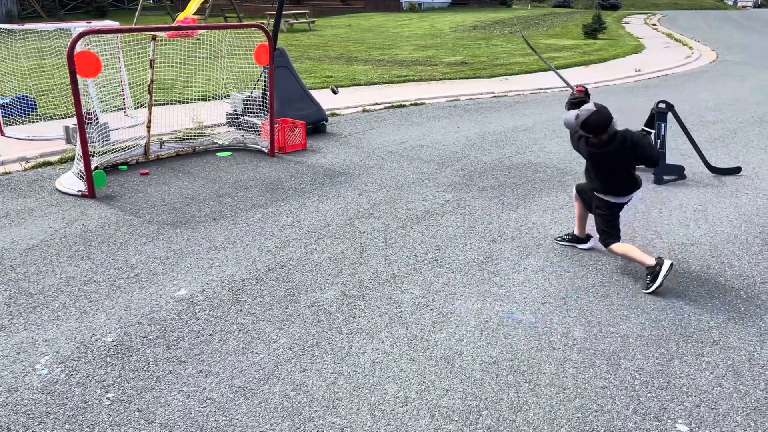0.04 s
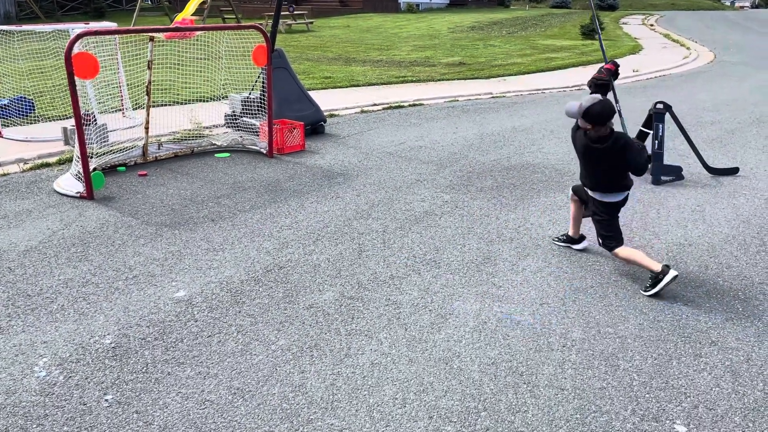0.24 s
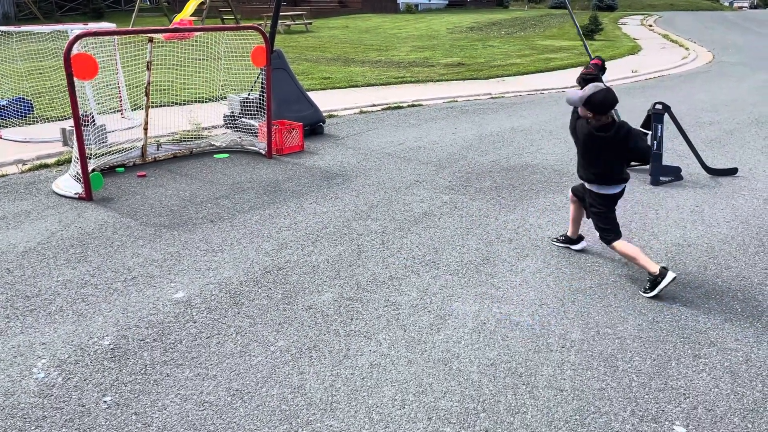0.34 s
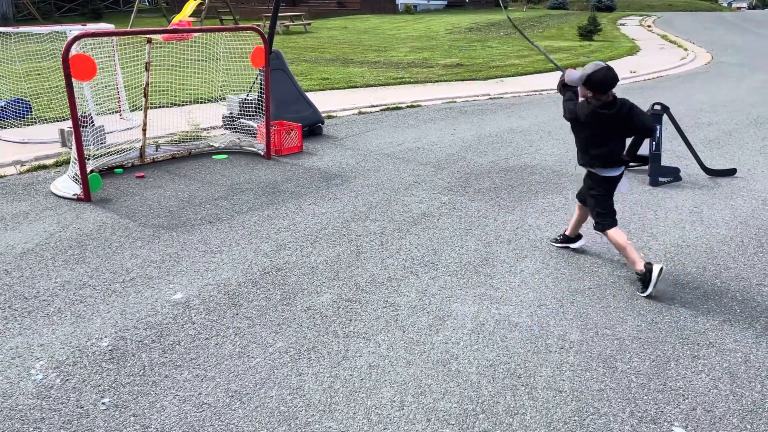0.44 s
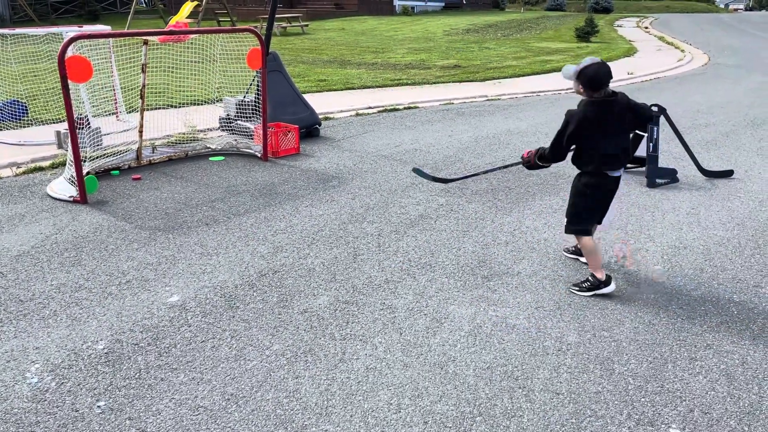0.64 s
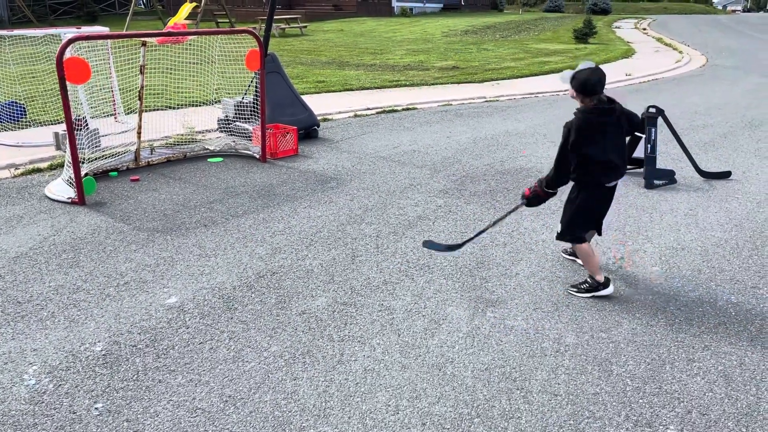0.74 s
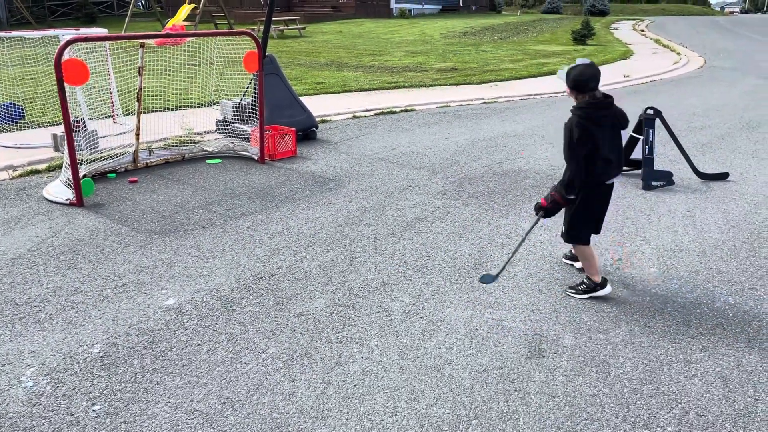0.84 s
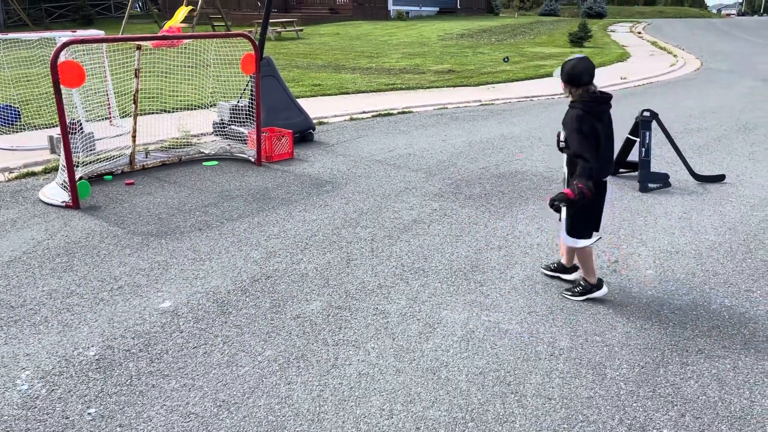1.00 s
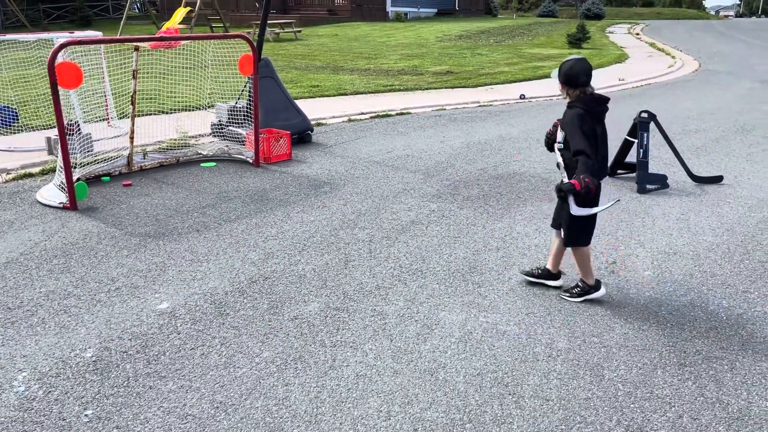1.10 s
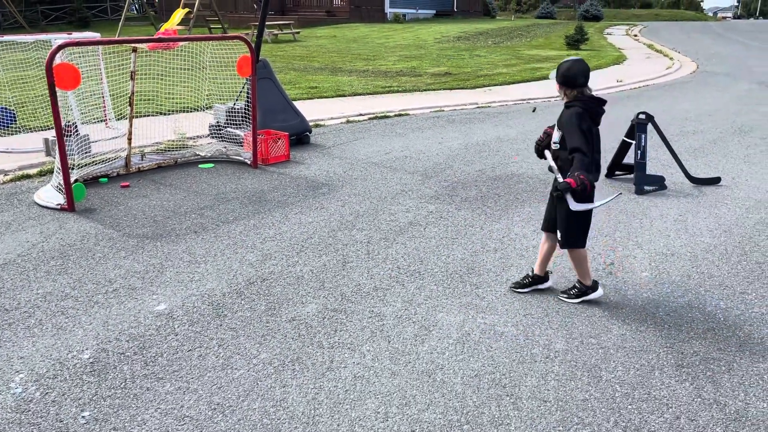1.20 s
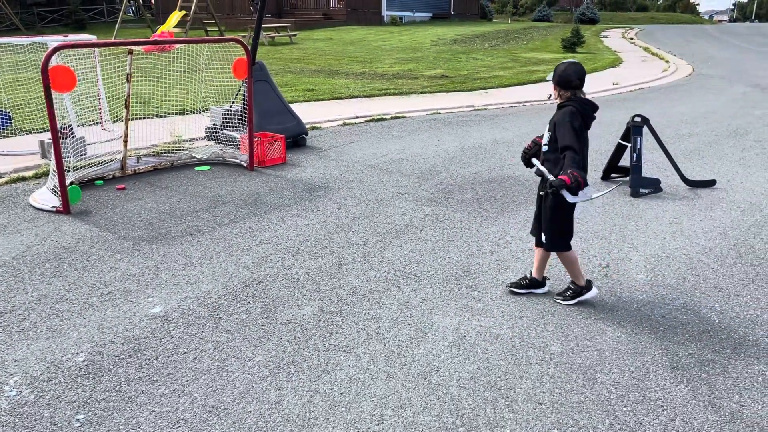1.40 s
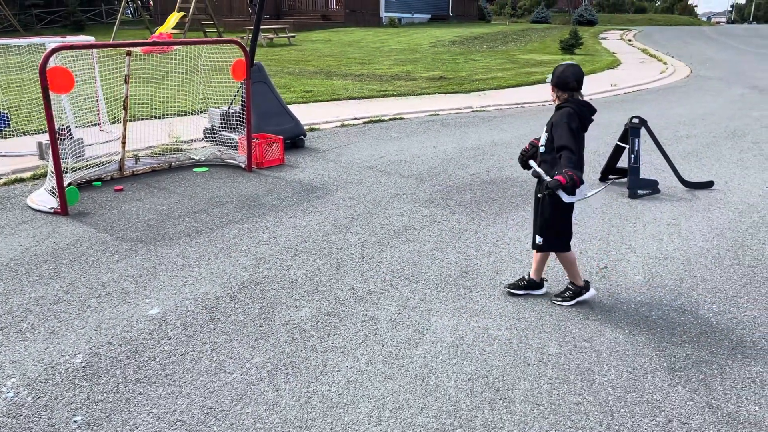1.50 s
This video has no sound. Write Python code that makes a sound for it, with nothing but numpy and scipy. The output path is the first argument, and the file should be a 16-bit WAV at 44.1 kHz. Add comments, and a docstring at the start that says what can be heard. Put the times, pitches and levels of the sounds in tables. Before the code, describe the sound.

Outdoors on pavement, a puck hits a hockey goal with a loud crack, then comes down with a quieter, crisp clack. Both impacts echo off the surroundings, with faint shoe scuffs between them and a soft rumble behind.

```python
"""Over a low outdoor rumble, the echo of a hockey shot is fading. At 0.22 s the puck grazes and strikes
a goal on a paved driveway; the impact excites the frame's modes, and houses and trees reflect the sound.
While the puck is in the air, the player's shoes scuff the asphalt. At 1.21 s the puck lands with a
short, heavily damped clack, which echoes in turn, with two short narrow-band swells."""
import sys
import numpy as np
from scipy import signal
from scipy.fft import rfft, irfft
from scipy.io import wavfile
from scipy.ndimage import uniform_filter1d

SR = 44100
rng = np.random.default_rng(int(sys.argv[2]) if len(sys.argv) > 2 else 0)


def persist_wave(psi):
    """Save psi, clipped to +-1, as 16-bit WAV."""
    counts = np.round(np.clip(psi, -1, 1) * 32767).astype(np.int16)
    wavfile.write(sys.argv[1], SR, np.atleast_2d(counts).T)


N = 68355

# Left-right coherence of near sounds and of the surroundings: f/Hz, coherence
NEAR_COHERENCE = [(200, 0.97), (1500, 0.78), (12000, 1)]
FAR_COHERENCE = [(60, 0.96), (150, 1), (300, 0.88), (640, 0.37), (1400, 0), (3000, 0.13), (7000, 0)]
# Noise spectra of the background, scuffs and grit: f/Hz, relative level/dB
RUMBLE_SPECTRUM = [(20, -28), (40, -12), (60, 0), (85, 1), (120, -6.5), (180, -6.5), (280, -16),
                   (450, -28.5), (1000, -34), (3000, -37), (5000, -43.5), (8000, -54.5), (11500, -46),
                   (16000, -62)]
SCUFF_SPECTRUM = [(100, -2), (500, -3), (1650, 5), (2700, -6), (4400, 0), (6500, -11.5), (8500, -31),
                  (11000, -12), (16000, -50)]
TICK_SPECTRUM = [(500, -18), (3000, -27), (11000, 25), (16000, -12)]
# Shoe scuffs: t/s, duration/s, level/dB
SCUFFS = [(.609, 0.015, -41.5), (0.797, 0.012, -64), (1.085, 0.0094, -61.5), (1.111, 0.01, -58),
          (1.136, 0.011, -62), (1.156, 0.02, -61), (1.192, 0.03, -53)]
# Grit ticking underfoot: t/s, level/dB
TICKS = [(0.075, -57), (.632, -50), (.72, -61.5), (0.806, -61.5)]
# Narrow-band swells in the echoes of both hits: t/s, duration/s, level/dB, f/Hz, filter bandwidth/Hz
ECHO_BLOOMS = [(0.304, 0.018, -47, 2760, 800), (.466, 0.017, -46, 2530, 600),
               (0.501, 0.032, -45.5, 2810, 537), (0.533, 0.054, -44.5, 1175, 330),
               (1.328, 0.019, -53.5, 2100, 800), (1.475, 0.04, -50.5, 2480, 503)]
# Decaying noise bands of the shot's echo, landing and goal: f/Hz, relative level/dB, T60/s
SHOT_BANDS = [(150, -6, 1), (500, -2.5, .9), (1297, 2, 0.93), (2800, -2, 1), (6700, -11, 1),
              (8300, -33, 0.78), (11000, -28.5, .7), (16000, -47, .6)]
CLACK_BANDS = [(80, -27, .09), (180, -13.5, 0.13), (400, -14.5, 0.039), (1150, -10, 0.012),
               (1620, -3.5, .015), (2500, 0.5, 0.036), (4000, -19, 0.031), (5800, -12, 0.028),
               (7800, 0.5, 0.018), (9200, -7.5, 0.013), (11600, -10.5, 0.043), (16000, -29, .022)]
CRACK_BANDS = [(60, -25.5, .1), (148, -3, 0.16), (450, -7.5, 0.13), (1250, -6, 0.087), (2700, -3, .09),
               (4080, -5.5, 0.07), (9100, -7, 0.052), (16000, -23.5, 0.043)]
# Distinct modes of the landing and of the goal: f/Hz, relative level/dB, T60/s
CLACK_MODES = [(170.5, -32, 0.11), (1631, -14.5, .015), (2190, -7.5, .016), (2385, -20, 0.015),
               (2820, -12.5, 0.012), (3418, -15, 0.027), (4700, -24, 0.021), (6834, -5, 0.012),
               (6943, -17, 0.031), (7390, -9, 0.011)]
CRACK_MODES = [(195.5, -28.5, .15), (314, -21.5, 0.082), (560, -17, .045), (710, -12.5, .05),
               (781.5, -16, 0.095), (881, -17, 0.1), (965, -14.5, .068), (1134, -21, .116),
               (1395, -18.5, 0.12), (1970, -18.5, 0.083), (2316, -14.5, .08), (2385, -18.5, 0.14),
               (2535, -15.5, .075), (2793, -16, 0.06), (2987, -14, 0.075), (3080, -15, 0.047),
               (3210, -12, .04), (3516, -11, 0.055), (5225, -16, 0.062), (6310, -17, 0.034),
               (6945, -15, 0.049)]
# Left minus right at the microphone ports: f/Hz, level/dB, phase/rad
CLACK_PORTS = [(200, 0.5, -1), (2200, -1, 0.9), (3300, 3, 0.5), (4680, 4.5, 0.6), (6940, 1.5, -1.66),
               (11040, 0, -6)]
CRACK_PORTS = [(152, 0.5, -1.44), (750, 3.5, 0.99), (1080, 9, 2.17), (2000, 5, -1.36), (2370, -1.5, 1.1),
               (2600, 7.5, 0.37), (3080, 6.5, 1.18), (3470, 1, 0.46), (6400, 1.5, -0.53),
               (10900, -0.5, -6.2)]
# Swells in the scatter, from single houses and trees: delay/s, level/dB, T60/s
CLACK_SWELLS = [(0.042, -42.5, 0.057), (.125, -52, 0.15), (.163, -50, 0.29), (.191, -43, .15),
                (0.275, -60, 0.075)]
CRACK_SWELLS = [(0.169, -43, 0.16), (0.202, -40.5, 0.19), (.288, -58, 0.35), (0.317, -47, 0.49)]
# Spectra of the scatter (the crack's also colours the graze): f/Hz, relative level/dB
CLACK_SPECTRUM = [(150, -2), (500, -8.5), (1100, -25.5), (2480, 4.5), (3000, -9), (3480, -4), (3800, -18),
                  (6100, -19), (6950, -1.5), (7400, -15.5), (8600, -38), (11400, -16.5), (15000, -39)]
CRACK_SPECTRUM = [(100, -3.5), (400, -2.5), (800, 0), (1400, 0), (2900, 2), (4000, -4), (5300, -8.5),
                  (7000, -11.5), (8500, -35), (10500, -18.5), (12500, -26), (16000, -45.5)]
# Echo from a flat wall: delay/s, gain/dB, response as rows of (f/Hz, gain/dB)
CLACK_WALL = (.2268, -23, [(2150, -11), (2600, 4), (3400, -3), (4500, -15)])
CRACK_WALL = (.2025, -28, [(300, -10), (2900, 0), (3500, -5), (5200, 7), (7000, 2), (9000, -16)])
# Microphone response: f/Hz, gain/dB
MICROPHONE = [(12500, 0), (14000, -2.5), (15000, -10), (16500, -10.5)]
# Scatter from trees and houses: level/dB, hold/s, T60/s
CLACK_SCATTER, CRACK_SCATTER = (-55.5, .26, .49), (-48, .31, .81)
# Early reflections from the driveway and nearest walls: gain/dB, T60/s
CLACK_YARD, CRACK_YARD = (-22, .11), (-18.5, .043)

CRACK_S, CLACK_S, GRAZE_S = .2199, 1.2071, .0035


def amp(db):
    """Amplitude grows tenfold for every 20 dB."""
    return 10 ** (np.asarray(db) / 20)


def unit(x):
    """Normalisation to an rms of one."""
    return x / np.sqrt(np.mean(x ** 2) + 1e-20)


def decay(t, t60):
    """Exponential damping: 60 dB in t60 seconds."""
    return np.exp(-np.log(1000) * t / t60)


def read(table, hz, column=1):
    """Interpolation of a table column on a log-frequency axis."""
    rows = np.array(table)
    return np.interp(np.log(hz + 1), np.log(rows[:, 0] + 1), rows[:, column])


def pan(db):
    """A level difference, shared equally between left and right."""
    return amp(np.array([[.5], [-.5]]) * db)


def add(mix, start_s, sound):
    """Superposition: a sound adds to the mix from start_s on."""
    part = mix[:, max(round(start_s * SR), 0):][:, :sound.shape[1]]
    part += sound[:, :part.shape[1]]


def tint(x, response):
    """Linear filtering: the spectrum is multiplied by a response."""
    hz = np.fft.rfftfreq(x.shape[1], 1 / SR)
    return irfft(rfft(x) * amp(read(response, hz)), x.shape[1])


def noise(spectrum, coherence, size):
    """Partially coherent noise: left and right share a random-phase component."""
    hz = np.fft.rfftfreq(size, 1 / SR)
    left, independent = np.exp(2j * np.pi * rng.random((2, len(hz))))
    shared = np.clip(read(coherence, hz), -1, 1)
    right = shared * left + np.sqrt(1 - shared ** 2) * independent
    return unit(irfft(np.array([left, right]) * amp(read(spectrum, hz)), size))


def flicker(size, depth_db, span):
    """Random amplitude modulation: a gain smoothed over span samples."""
    return amp(depth_db * unit(uniform_filter1d(rng.standard_normal(size), span)))


def patchy(x, depth_db=3.0):
    """Modulation in time and frequency breaks smooth noise into short patches."""
    spectra = signal.stft(x)[2]
    field = uniform_filter1d(rng.standard_normal(spectra.shape[1:]), size=4, axis=1)
    field = uniform_filter1d(field, size=5, axis=0)
    return unit(signal.istft(spectra * amp(depth_db * unit(field)))[1][:, :x.shape[1]])


def clatter(bands, coherence, rise_s, size):
    """Modal overlap: countless close modes act as noise, each band with its own rise and decay."""
    t, hz = np.arange(size) / SR, np.fft.rfftfreq(size, 1 / SR)
    centres = np.geomspace(60, 16000, 20)
    spectrum, out = rfft(noise(bands, coherence, size)), 0
    for centre, pick in zip(centres, np.eye(len(centres))):
        band = irfft(spectrum * np.interp(hz, centres, pick), size)
        rise = np.minimum(t / (rise_s + 1.3 / centre), 1)  # 1.3 cycles: low bands swell more slowly
        out = out + band * rise * decay(t, read(bands, centre, column=2))
    return out


def ring(modes, rise_s, size):
    """Free vibration: a sum of damped sinusoids of alternating sign."""
    t, out = np.arange(size) / SR, 0
    for k, (hz, db, t60) in enumerate(modes):
        envelope = amp(db) * np.minimum(t / (rise_s + 1 / hz), 1) * decay(t, t60)
        out = out + (-1) ** k * envelope * np.sin(2 * np.pi * hz * t)
    return out


def ports(x, differences):
    """A wave reaches the two microphone ports with different level and phase."""
    size = x.shape[1]
    hz = np.fft.rfftfreq(2 * size, 1 / SR)
    phase = np.array([[.5], [-.5]]) * read(differences, hz, column=2)
    return irfft(rfft(x, 2 * size) * pan(read(differences, hz)) * np.exp(1j * phase))[:, :size]


def rumble():
    """Ambient noise: low rumble and faint hiss under a slight, slow modulation."""
    swell_db = .92 * np.interp(np.arange(N), np.linspace(0, N, 16), rng.standard_normal(16))
    return amp(-52 + swell_db) * noise(RUMBLE_SPECTRUM, FAR_COHERENCE, N)


def shot_echo():
    """Reverberant decay: the last of the shot returns from far away."""
    return amp(-50.5) * clatter(SHOT_BANDS, FAR_COHERENCE, rise_s=.00052, size=32768)


def echo_blooms():
    """Band-limited noise: short narrow-band swells in the echoes of the crack and the clack."""
    out, t = np.zeros((2, N)), np.arange(SR // 10) / SR
    for start, length, db, hz, width in ECHO_BLOOMS:
        peak = signal.iirpeak(hz, hz / width, SR)
        white = rng.standard_normal((2, len(t)))
        band = unit(signal.lfilter(*peak, signal.lfilter(*peak, white)))
        add(out, start, amp(db) * np.sin(np.pi * np.minimum(t / length, 1)) * band)
    return out


def scatter(tail, swells, spectrum):
    """Diffuse scattering: returns from houses and trees are incoherent, so their powers add."""
    t = np.arange(SR) / SR
    tail_db, hold_s, tail_t60 = tail
    power = (amp(tail_db) * np.minimum(t / .015, 1) * decay(np.maximum(t - hold_s, 0), tail_t60)) ** 2
    for delay, db, t60 in swells:
        age = np.maximum(t - delay, 0)
        power += (amp(db) * np.minimum(age / .004, 1) * decay(age, t60)) ** 2
    grain = flicker(SR, depth_db=.5, span=150)
    return np.sqrt(power) * grain * patchy(noise(spectrum, FAR_COHERENCE, SR))


def add_paths(out, hit, yard, wall):
    """Multipath propagation: direct sound, dulled early reflections and one specular wall echo."""
    (yard_db, yard_t60), (wall_s, wall_db, wall_response) = yard, wall
    taps = rng.standard_normal((2, SR)) * decay(np.arange(SR) / SR, yard_t60)
    taps /= np.linalg.norm(taps, axis=1, keepdims=True)
    early = signal.lfilter(*signal.butter(1, 7300, fs=SR), taps)
    add(out, 0, hit)
    add(out, 0, amp(yard_db) * signal.fftconvolve(hit, early, axes=1))
    add(out, wall_s, amp(wall_db) * tint(hit[::-1], wall_response))  # left and right swap


def shoes(release_s=.0063, tick_s=.0015):
    """Friction on asphalt: broadband scuffs and ticks of loose grit."""
    out, t = np.zeros((2, N)), np.arange(SR // 10) / SR
    for start, length, db in SCUFFS:
        grit = unit(flicker(len(t), depth_db=1.5, span=40))
        envelope = np.minimum(2 * t / release_s, 1) * np.exp(-np.maximum(t - length, 0) / release_s)
        scuff = grit * noise(SCUFF_SPECTRUM, NEAR_COHERENCE, len(t))
        add(out, start, amp(db) * pan(db=4.0) * envelope * scuff)
    for start, db in TICKS:
        add(out, start, amp(db) * np.exp(-t / tick_s) * noise(TICK_SPECTRUM, NEAR_COHERENCE, len(t)))
    return out


def landing_clack(rise_s=.00052, size=4096):
    """Impact with heavy damping: the puck lands with a bright clack over a small thud, then echoes."""
    hit = amp(-14.5) * clatter(CLACK_BANDS, NEAR_COHERENCE, rise_s, size)
    hit += amp(-1.5) * ring(CLACK_MODES, rise_s, size)
    out = scatter(CLACK_SCATTER, CLACK_SWELLS, CLACK_SPECTRUM)
    add_paths(out, ports(hit, CLACK_PORTS), CLACK_YARD, CLACK_WALL)
    return out


def graze():
    """A brief contact has a broad spectrum: the puck touches the goal just before the full blow."""
    t = np.arange(1024) / SR
    return amp(-33) * np.exp(-t / GRAZE_S) * noise(CRACK_SPECTRUM, NEAR_COHERENCE, len(t))


def goal_crack(rise_s=.0027, size=8192):
    """Impulsive excitation: the puck sets the goal clattering and its frame ringing, with echoes."""
    hit = amp(-13) * clatter(CRACK_BANDS, NEAR_COHERENCE, rise_s, size)
    hit += amp(-2) * ring(CRACK_MODES, rise_s, size)
    out = scatter(CRACK_SCATTER, CRACK_SWELLS, CRACK_SPECTRUM)
    add_paths(out, ports(hit, CRACK_PORTS), CRACK_YARD, CRACK_WALL)
    return out


def scene():
    """Superposition of both impacts on the driveway's other sounds."""
    mix = rumble() + shoes() + echo_blooms()
    add(mix, 0, shot_echo())
    add(mix, CRACK_S - GRAZE_S, graze())
    add(mix, CRACK_S, goal_crack())
    add(mix, CLACK_S, landing_clack())
    return mix


def record(dry, cutoff_hz=16300):
    """Low-pass filtering: the microphone's dull top octave, then a steep band limit."""
    lowpass = signal.firwin(511, cutoff_hz, window=("kaiser", 9), fs=SR)
    return signal.oaconvolve(tint(dry, MICROPHONE), lowpass[None], "same")


dry = scene()
out = record(dry)
persist_wave(out)
```